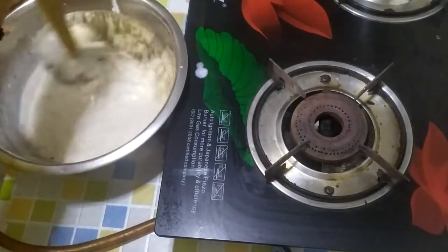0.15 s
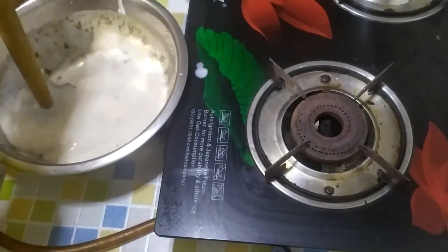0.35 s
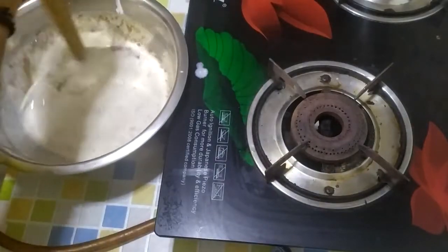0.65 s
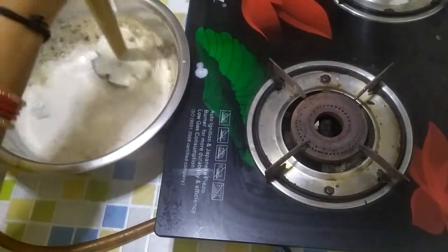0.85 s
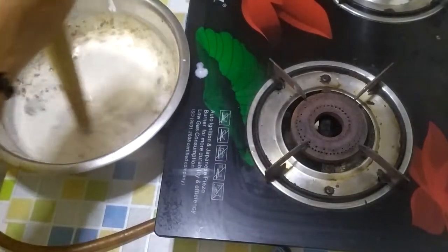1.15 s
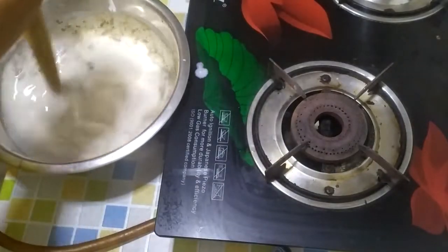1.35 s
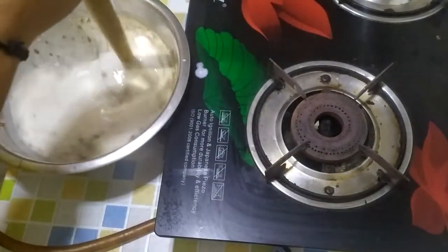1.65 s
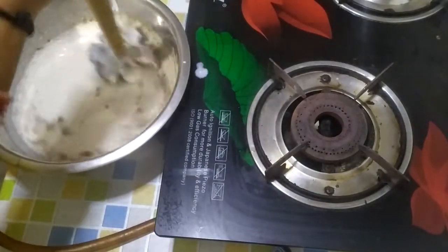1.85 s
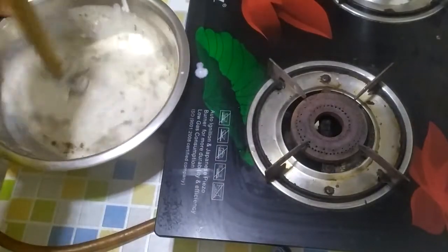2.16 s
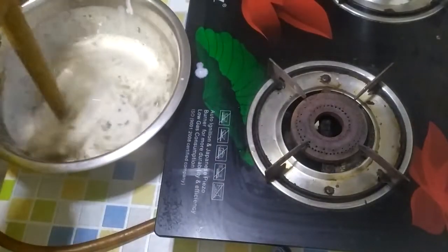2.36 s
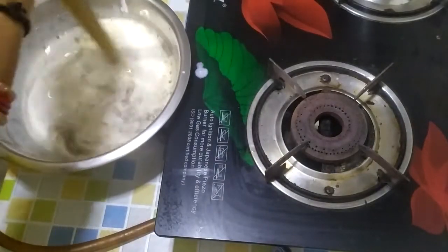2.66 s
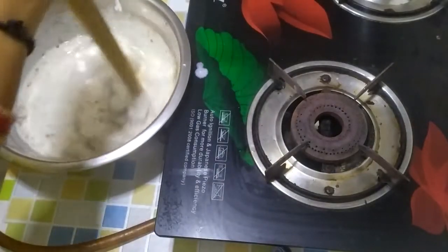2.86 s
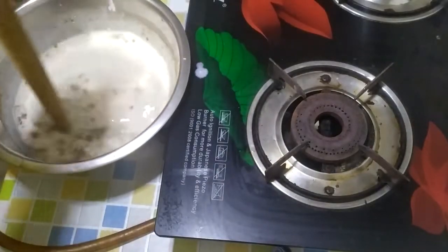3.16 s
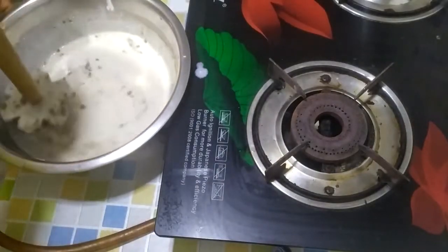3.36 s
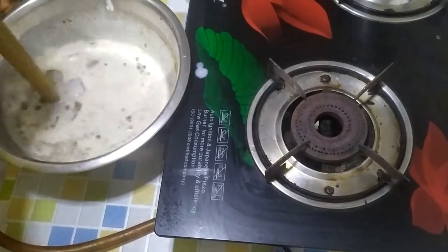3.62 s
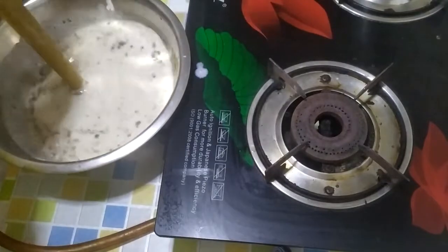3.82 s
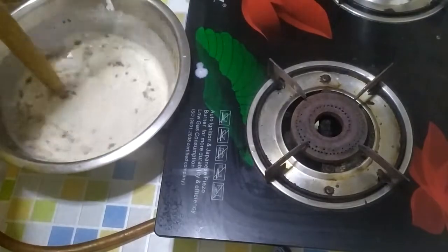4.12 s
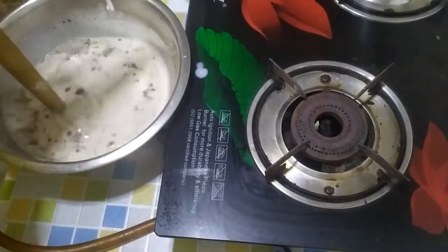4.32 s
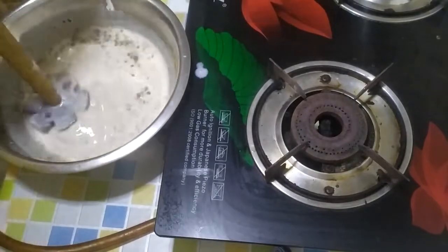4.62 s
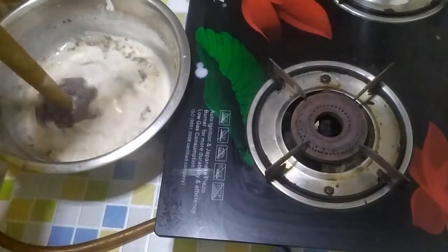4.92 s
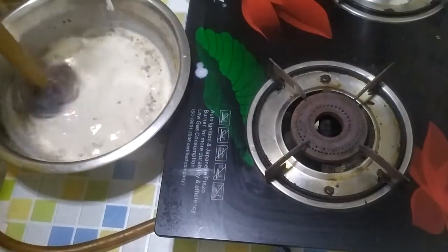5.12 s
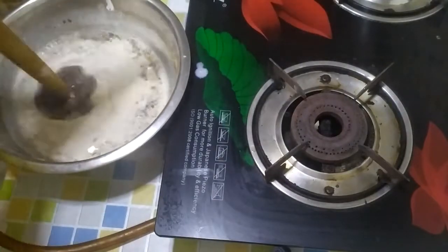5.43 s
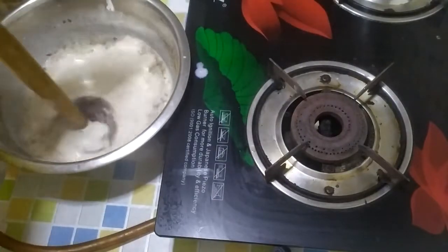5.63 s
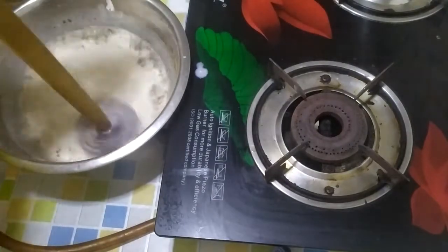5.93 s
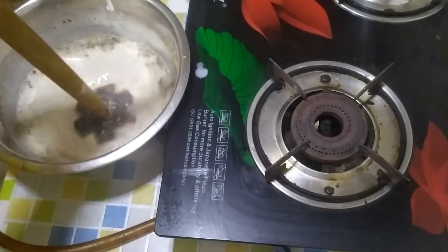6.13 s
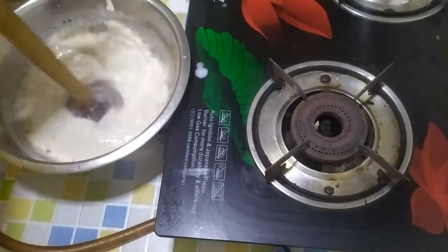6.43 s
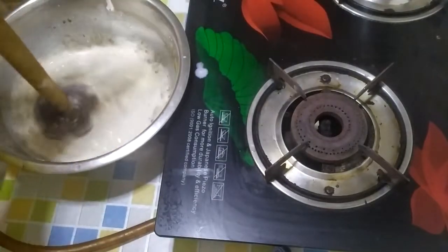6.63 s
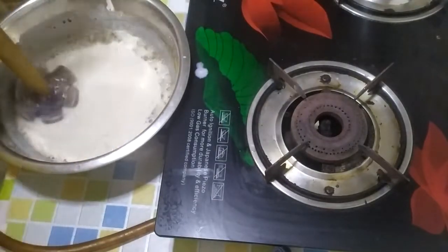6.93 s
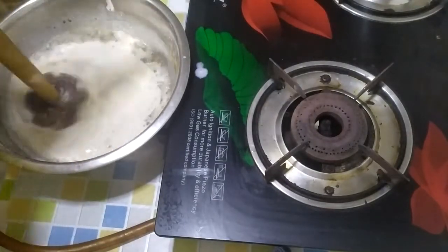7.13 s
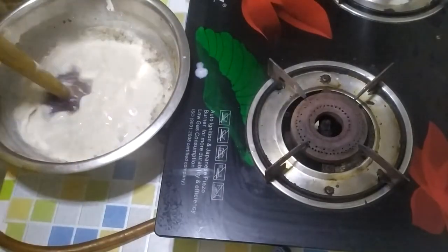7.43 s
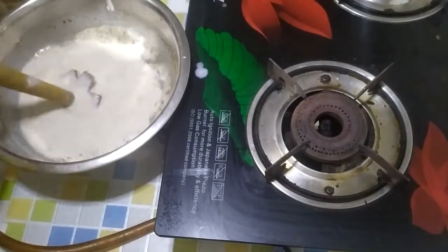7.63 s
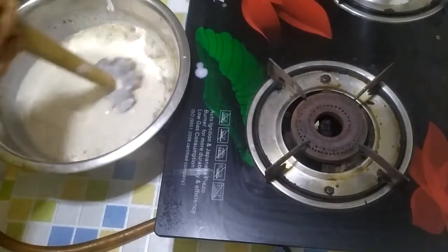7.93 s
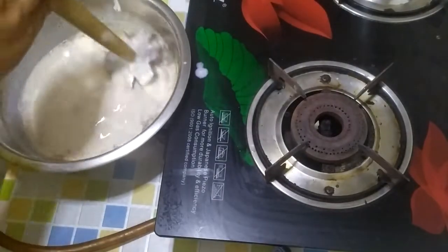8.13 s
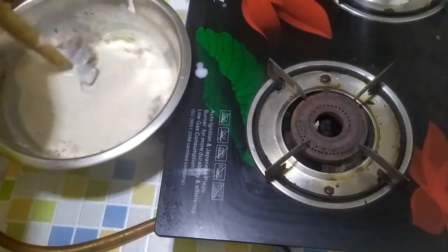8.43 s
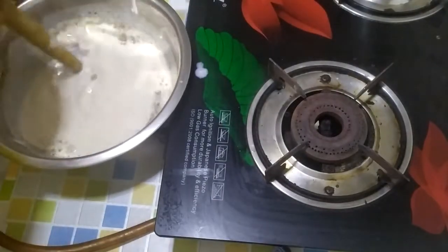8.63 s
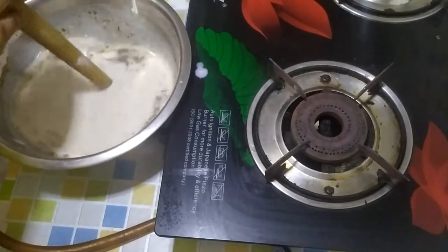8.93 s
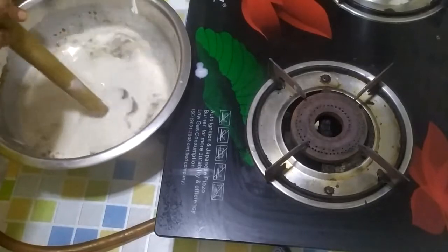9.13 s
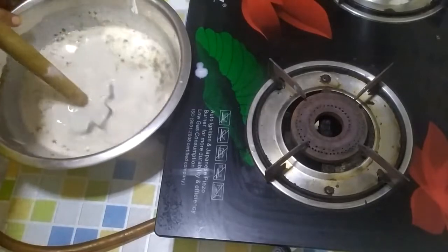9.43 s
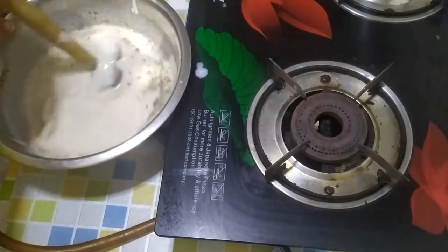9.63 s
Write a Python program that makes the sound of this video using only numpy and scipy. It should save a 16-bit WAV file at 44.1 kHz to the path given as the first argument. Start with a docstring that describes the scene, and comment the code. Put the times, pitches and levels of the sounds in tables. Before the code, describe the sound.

Soft wet smacks and little splashes come from thick yogurt being churned with a wooden stick, heard up close in a kitchen. The wood occasionally knocks the steel bowl, giving a short damped ring, and the bowl bumps dully on the worktop. The churning is liveliest in the second half and thins to a few wet clicks at the end, over a low room rumble.

```python
"""Churning yogurt in a steel bowl.

A wooden churner stirs and spins in thick yogurt in a hard-walled kitchen. Cavities splash,
air pockets pop, tiny smacks crackle. Knocks ring the bowl's modes; the worktop thumps and hums low.
Faint tones waver in the room noise. A phone's noise suppressor holds that noise down and shortens tails."""
import sys
import numpy as np
from scipy import signal
from scipy.fft import rfft, irfft, next_fast_len
from scipy.io import wavfile
from scipy.ndimage import uniform_filter1d

SR = 44100
rng = np.random.default_rng(int(sys.argv[2]) if len(sys.argv) > 2 else 0)


def inscribe(sig):
    """Save sig as 16-bit PCM at rate SR to the path in sys.argv[1].

    A 1-D sig is mono; a 2-D sig holds one channel per row.
    Samples are clipped to [-1, 1] before scaling.
    """
    pcm = np.round(np.clip(np.atleast_2d(sig).T, -1, 1) * 32767)
    wavfile.write(sys.argv[1], SR, pcm.astype(np.int16))


N = 430857

# Worktop and room hum. Each row: time in seconds, level in dB.
HUM_LEVELS = [(0.0, -57.5), (0.728, -57.5), (1.74, -63.5), (2.179, -54.5), (2.748, -73), (2.94, -56),
              (3.539, -68), (3.999, -52.5), (4.35, -57), (4.98, -54), (5.17, -46.5), (5.66, -62.5),
              (6.15, -47), (6.532, -57), (7.7, -47.5), (8.431, -59), (9.01, -58), (9.77, -61)]
# Each row: pitch in Hz, width in Hz, dB re hum level, fade after a stroke in dB/s.
WORKTOP_MODES = [(77.1, 13, -4, 85), (133.6, 24.3, 1.5, 132.5), (251, 190, -14, 155)]
# Each row: start in seconds, then lower mode, upper mode and slosh levels in dB.
HEAVY_STROKES = [(.06, -62.5, -90, -64.5), (.45, -50.5, -56.5, -64.5), (0.741, -51, -60, -53),
                 (1.041, -51, -53, -56.5), (1.94, -53, -61, -66), (2.206, -48.5, -48, -56.5),
                 (2.761, -54, -45, -52), (3.812, -30, -28.5, -56.5), (3.961, -47.5, -39, -74),
                 (4.138, -46.5, -41.5, -101), (4.52, -50.5, -73, -71.5), (5.066, -52, -44, -55.5),
                 (5.159, -39.5, -49, -42), (5.628, -47, -41, -36), (5.95, -38.5, -43, -30.5),
                 (6.17, -41, -45, -61), (6.73, -59, -61, -87.5), (6.883, -38, -44, -36.5),
                 (6.968, -39.5, -58.5, -43.5), (7.349, -40, -44, -41), (7.521, -25.5, -52.5, -43),
                 (7.719, -39, -69.5, -89.5), (7.907, -49.5, -52, -85), (8.092, -45.5, -50, -35),
                 (8.24, -55.5, -47.5, -59.5), (8.623, -64.5, -44, -57.5), (8.88, -55.5, -60, -69.5),
                 (9.097, -45, -45.5, -51), (9.3, -55.5, -78, -70.5)]
# Each row: frequency in Hz, relative noise density in dB.
ROOM_SPECTRUM = [(12, -58), (20, -1), (133, -6), (387, -21), (606, -20.5), (739, -21), (1340, -39.5),
                 (1680, -49.5), (2630, -53.5), (2980, -32.5), (3460, -44.5), (5160, -48.5), (7680, -47),
                 (9980, -96.5), (16900, -120)]
# Each row: pitch in Hz, width in Hz, level in dB, waver in dB.
STEADY_WHINES = [(1661, 110, -83, 3)]
# Each row: pitch in Hz, width in Hz, waver in dB.
TREBLE_WHINES = [(5150, 34, 1.5), (2990, 60, 2.5)]
# Each row: time in seconds, upper whine in dB, lower whine in dB.
TREBLE_WHINE_LEVELS = [(0, -99.5, -71), (.2, -82.5, -80.5), (.55, -77.5, -71), (.75, -98.5, -78),
                       (1.1, -89, -89), (1.25, -82, -80.5), (1.7, -80.5, -103.5), (1.9, -88.5, -88.5),
                       (2.15, -78, -74.5), (2.7, -79, -80.5), (2.96, -78, -86), (3.1, -85, -89.5),
                       (3.35, -97, -93.5), (3.6, -83, -85), (3.9, -82, -80), (4.25, -80.5, -76.5),
                       (4.42, -81, -77), (4.8, -87, -82.5), (5.6, -88, -77.5), (6.5, -83.5, -72),
                       (6.85, -84.5, -82), (7.601, -86.5, -84), (7.9, -99, -85), (8.45, -92, -96),
                       (8.57, -93.5, -75.5), (8.75, -88.5, -85.5), (8.9, -83.5, -86), (9.05, -81, -82),
                       (9.15, -91, -85), (9.359, -75.5, -93.5), (9.55, -91.5, -86.5), (9.77, -92, -86.5)]
# Fuzzy hollow tone. Each row: time in seconds, level in dB.
HOLLOW_LEVELS = [(0, -73), (.3, -71), (.55, -75.5), (.8, -71.5), (1.4, -77.5), (1.55, -63.5), (1.75, -75.5),
                 (2.17, -64), (2.35, -75.5), (3.15, -76), (3.25, -68), (3.6, -79), (3.85, -66), (4.15, -69),
                 (4.4, -75.5), (5.05, -67.5), (6.6, -68), (7.95, -66), (8.4, -65.5), (8.52, -75.5),
                 (8.65, -65), (8.8, -76), (9.13, -68), (9.28, -78.5), (9.4, -70), (9.77, -78.5)]
# Each row: time in seconds, level in dB.
CRACKLE_LEVELS = [(0.0, -67.5), (0.272, -71), (0.52, -69.5), (.8, -70), (1.1, -66.5), (1.33, -71),
                  (1.66, -70), (1.85, -70), (2.3, -74.5), (2.86, -69.5), (3.211, -71), (4.19, -74.5),
                  (5.3, -72), (5.85, -62), (6.28, -69.5), (6.77, -72), (6.94, -73.5), (7.05, -58.5),
                  (7.529, -69.5), (7.731, -86.5), (8.49, -75), (9.77, -76)]
# Splashes and wet clicks. Each row: start in seconds, cavity ring in dB, puff in dB,
# puff centre in octaves above 2.8 kHz, cavity pitch in Hz, decay in seconds (capped by burst).
SPLASH_EVENTS = [(0.0014, -52.5, -50.5, 0.8, 1675, 0.0081), (0.0606, -45, -47, 0.03, 2800, 0.007),
                 (.1, -53, -58, -0.43, 2820, .008), (0.149, -65.5, -69, 1, 4214, 0.03),
                 (0.327, -65, -56, -0.9, 5200, 0.0059), (0.3394, -59, -41, 0.93, 4770, 0.027),
                 (0.561, -62.5, -57, -1.1, 4870, 0.033), (0.5774, -60, -49.5, 0.65, 5600, 0.037),
                 (0.624, -51.5, -75, 2.7, 1530, 0.013), (0.679, -66, -78, 1.5, 6480, 0.0078),
                 (0.692, -52.5, -53.5, -0.6, 2210, 0.016), (0.707, -62.5, -78, 1.2, 4000, 0.019),
                 (0.796, -39.5, -51, 0.26, 1880, 0.0029), (0.869, -63, -73, 2.2, 4710, 0.021),
                 (0.916, -55.5, -64.5, -0.8, 2160, 0.0068), (0.992, -54, -48.5, -1.77, 1200, 0.0034),
                 (1.018, -44.5, -58, 0.2, 1290, 0.01), (1.047, -42.5, -51, 0.35, 4350, 0.0037),
                 (1.058, -55, -69, 0, 2985, .01), (1.092, -50.5, -58.5, 0.54, 3750, 0.0056),
                 (1.099, -60.5, -70.5, -1.2, 2286, 0.022), (1.273, -55, -69.5, 1.2, 2945, 0.011),
                 (1.291, -73, -64, -0.3, 4750, 0.011), (1.31, -54, -51.5, 0.25, 2250, 0.0062),
                 (1.372, -61.5, -61, 1, 4760, 0.012), (1.374, -56, -58, 0, 2910, 0.0082),
                 (1.434, -58.5, -78, 3.9, 4490, 0.0036), (1.435, -49, -64.5, 1.4, 1890, 0.005),
                 (1.511, -65, -64.5, 0.4, 2580, 0.019), (1.61, -64, -74, -2, 2750, .01),
                 (1.697, -56, -80.5, -3, 1130, .02), (1.666, -63, -69.5, 1.2, 4374, 0.011),
                 (1.904, -38.5, -94.5, -3.5, 10670, 0.0068), (1.905, -33.5, -30, 0.6, 6300, 0.0021),
                 (2.06, -57.5, -53.5, 0.63, 2357, 0.018), (2.312, -64, -47, 0.9, 4580, 0.032),
                 (2.4374, -68, -58, -0.8, 1710, 0.044), (2.645, -42.5, -54.5, -0.1, 2403, 0.0046),
                 (2.68, -66, -63, 0.5, 4300, 0.0059), (2.741, -40.5, -48.5, 0.4, 1650, 0.022),
                 (2.9763, -46.5, -42, -0.41, 3140, 0.008), (3.214, -61, -66, 0.7, 4650, 0.0091),
                 (3.546, -45.5, -44.5, 0.14, 4590, 0.0079), (3.583, -51.5, -67, 1.8, 4670, 0.0031),
                 (3.201, -62, -63.5, -1.5, 1000, .01), (3.21, -65, -75, 1.6, 3300, .006),
                 (3.797, -52, -55, -1, 1100, 0.013), (4.296, -55, -60, 0.5, 1560, 0.0049),
                 (4.32, -52, -62.5, 0.7, 1737, 0.0059), (4.321, -54, -74, -2, 2430, .005),
                 (4.322, -58.5, -80, -2, 1210, .006), (4.439, -55.5, -53.5, -1.1, 1500, 0.015),
                 (4.44, -50.5, -62.5, -0.5, 3040, .012), (4.449, -61.5, -64, 1.3, 4430, .012),
                 (4.52, -51, -51.5, 0.18, 2960, 0.018), (4.54, -64, -52, 0.9, 4250, 0.0083),
                 (4.544, -42.5, -48, -0.08, 1595, 0.024), (4.597, -48, -41, 0.38, 4220, 0.0038),
                 (4.794, -52.5, -59, -0.9, 2490, 0.05), (4.83, -55, -55, 0.5, 2340, 0.0057),
                 (4.847, -56.5, -52, 0.54, 2550, 0.05), (4.855, -43.5, -45, -0.65, 2850, 0.023),
                 (4.955, -50.5, -48, -0.86, 5010, 0.0035), (4.995, -51.5, -57, 0.7, 2594, 0.0086),
                 (5.069, -36, -47.5, 0.07, 1860, 0.0056), (5.112, -48, -60.5, -0.7, 1750, 0.0055),
                 (5.173, -27, -31.5, -0.15, 2700, 0.0029), (5.393, -48.5, -74.5, 7, 4740, 0.0055),
                 (5.409, -40, -62.5, 1, 2990, 0.0074), (5.427, -35, -48.5, -0.6, 2625, 0.0063),
                 (5.433, -51, -46, 0.49, 5300, 0.0034), (5.44, -43, -45, -0.13, 2930, 0.014),
                 (5.479, -42.5, -37, 0.15, 3100, 0.0059), (5.487, -42.5, -65.5, -0.29, 3650, .01),
                 (5.522, -51, -59, 0.9, 5300, 0.005), (5.606, -53, -51, -1.2, 4630, 0.0026),
                 (5.618, -45, -40, 0.64, 2360, 0.0085), (5.6286, -32, -34.5, -0.37, 2580, 0.013),
                 (5.806, -52, -79.5, 2.3, 4660, 0.0025), (5.944, -38, -92.5, 2.5, 11200, 0.011),
                 (5.946, -39, -30.5, 0.36, 1595, 0.015), (6.061, -38, -39, 0.46, 2420, 0.01),
                 (6.081, -56.5, -51, 0.14, 4970, 0.033), (6.11, -36, -43, 0.45, 2260, 0.0082),
                 (6.258, -42.5, -56, -0.14, 2060, 0.019), (6.338, -46, -57, 0.3, 2142, 0.03),
                 (6.361, -64.5, -72, 1.8, 4440, 0.013), (6.389, -43, -60, 0.9, 4690, 0.0035),
                 (6.393, -33, -46, -0.4, 2726, 0.0064), (6.416, -45.5, -71, -1, 3090, 0.0052),
                 (6.441, -36.5, -42.5, 0.12, 2500, 0.0029), (6.601, -35, -41, -0.04, 2566, 0.0037),
                 (6.65, -37.5, -44.5, -0.03, 3044, 0.0038), (6.8897, -34.5, -32.5, -0.12, 1720, 0.0036),
                 (7.111, -54, -55, -1.9, 4980, 0.0034), (7.116, -49, -67.5, -1.8, 4600, 0.0035),
                 (7.118, -37, -78, -1.5, 1210, 0.01), (7.1194, -33.5, -32.5, -0.07, 2790, 0.0023),
                 (7.206, -44, -67.5, -1.2, 4610, 0.0019), (7.175, -61.5, -78, 0, 6750, 0.0031),
                 (7.288, -52.5, -67, -1.6, 2580, 0.0088), (7.299, -62, -79, 9, 6540, 0.0045),
                 (7.335, -32.5, -37, 0.4, 2530, 0.0077), (7.373, -44.5, -38, 0.7, 1824, 0.01),
                 (7.478, -40.5, -44.5, -0.7, 1332, 0.031), (7.515, -49.5, -64, 1.3, 4970, 0.0031),
                 (7.5625, -47.5, -57.5, 0.1, 2306, 0.049), (8.122, -42, -44.5, 0.03, 1194, 0.036),
                 (8.205, -50.5, -53, 0.44, 2766, 0.033), (8.814, -54.5, -70.5, 0.9, 4370, 0.003),
                 (8.922, -44, -55, -.5, 2266, 0.01), (8.967, -60, -63, -1.14, 2340, 0.017),
                 (9.027, -60.5, -65, 0.5, 3065, 0.023), (9.362, -57.5, -63.5, 0.5, 3500, 0.0092),
                 (9.546, -65.5, -56.5, -0.6, 2090, 0.11), (9.592, -62.5, -62, 0.2, 2136, 0.016)]
# Colour of all puffs. Each row: frequency in Hz, gain in dB.
PUFF_SPECTRUM = [(800, 10.5), (1300, 0.5), (2400, -1), (3300, -9), (5300, -8.5), (6800, -12), (11000, -1)]
# Each row: start in seconds, level in dB, pitch in Hz, length in seconds.
BRIEF_TONES = [(0.095, -66.5, 1046, 0.12), (0.057, -64, 453, 0.11), (2.068, -82.5, 1940, .3),
               (9.492, -77.5, 2987, .2), (0.701, -64.5, 1104, 0.12), (0.68, -85.5, 5566, 0.38),
               (0.421, -71, 3200, 0.1), (3.408, -77.5, 1680, 0.12), (4.211, -74.5, 1312, 0.049),
               (9.703, -69.5, 956, .05), (0.447, -77.5, 2110, 0.16), (1.037, -79, 2340, 0.25),
               (1.31, -67.5, 1140, 0.048), (6.568, -66.5, 1145, 0.12), (6.824, -78.5, 3860, 0.042),
               (0.182, -86.5, 5620, 0.2), (1.689, -85, 5720, 0.24), (2.074, -77, 1620, 0.15),
               (2.152, -82.5, 3760, 0.19), (2.293, -75.5, 3410, 0.56), (3.795, -63, 1023, 0.08),
               (4.42, -71.5, 4320, 0.23), (5.173, -59, 5460, 0.058), (6.351, -69.5, 1066, 0.088),
               (6.496, -64, 496, 0.3), (6.555, -72, 1646, 0.13), (6.951, -49.5, 489, 0.23),
               (7.136, -56, 896, 0.093), (7.453, -71.5, 2120, 0.44), (7.72, -55, 332, 0.26),
               (7.92, -71.5, 1320, 0.13), (8.201, -80, 2640, 0.21), (8.202, -75, 4220, 0.19)]
# Each row: start in seconds, level in dB, starting pitch in Hz, T60 in seconds.
AIR_POCKETS = [(0.065, -36.5, 726, 0.037), (0.611, -38, 715, 0.065), (0.699, -49, 680, 0.048),
               (1.025, -46, 1296, 0.03), (1.062, -34, 1020, 0.019), (1.267, -46.5, 1436, 0.019),
               (2.745, -49, 728, 0.092), (3.2, -54.5, 730, .12), (1.906, -20.5, 785, 0.023),
               (2.464, -63, 1495, 0.044), (4.54, -49, 1640, 0.042), (4.577, -41, 1322, 0.035),
               (4.593, -35, 1245, 0.012), (5.071, -39.5, 1823, 0.051), (5.384, -58.5, 1244, 0.13),
               (5.427, -42, 1210, 0.026), (6.512, -47.5, 529, 0.21), (6.628, -41.5, 560, 0.03),
               (6.742, -43.5, 521, 0.051), (7.167, -45, 467, 0.15), (7.422, -34, 1370, 0.03),
               (7.501, -37.5, 534, 0.061), (7.95, -67, 1285, 0.09)]
# Churner on bowl. Each row: start in seconds, level in dB, treble, bass and hollow-band trims in dB,
# ring gain in dB, contact decay in seconds (capped by burst).
BOWL_KNOCKS = [(1.902, -22, -13.5, -52, -1, 0, 0.0018), (2.739, -36.5, -13.5, -2.5, -9.5, -1.5, 0.0044),
               (3.795, -42, -18.5, 8.5, -2.5, 8.5, 0.0057), (4.064, -51, -37, 11, 11, 11, 0.011),
               (4.163, -58.5, -25, -5.5, -1, 5, 0.007), (5.154, -37, -6, 3, -1, 22, 0.005),
               (5.165, -39.5, -6, -2, 4.5, 9, 0.021), (5.62, -29.5, -19.5, -16.5, -3.5, 7.5, 0.0069),
               (5.941, -20.5, -6.5, -2.5, -3, 10.5, 0.0075), (6.872, -35.5, -5, 2, 6.5, 12, 0.019),
               (6.897, -31.5, 1.5, -15, 6, 8.5, 0.0047), (7.328, -47, -4.5, 2, 2, 12, 0.067),
               (7.406, -45, -9.5, 6.5, 9, 5.5, 0.036), (7.523, -49.5, -22.5, 1.5, 16, 8, 0.022),
               (8.088, -32, -5, 2, -4.5, -1, 0.013)]
# Each row: pitch in Hz, width in Hz, weight in dB (halved on use).
BOWL_MODES = [(234.3, 14, 8.5), (368, 22, -8.5), (443, 9.5, -12.5), (482, 69, -3), (607, 15, -5),
              (655, 22, 6), (863, 25, -13), (970, 36, -22.5), (1126, 190, -11), (1210, 230, -16),
              (1590, 33, -7.5), (1880, 21, -22), (2340, 47, -11.5), (2820, 300, -11), (3200, 20, -31.5),
              (4220, 38, -29), (5300, 19, -0.5), (6700, 500, -2.5)]
# Broad noise of a knock. Each row: frequency in Hz, gain in dB.
CRACK_SPECTRUM = [(88, -30), (150, -16), (198, -4), (238, 1), (533, -7), (650, 1.5), (717, -6.5),
                  (2860, -23.5), (4250, -31), (5430, -22.5), (7680, -38), (8800, -46.5), (10200, -43),
                  (11800, -30.5), (16900, -120)]
# Each row: centre time in seconds, level in dB, pitch in Hz.
WORKTOP_BUMPS = [(2.2215, -29, 134.4), (2.7525, -35.5, 198), (3.835, -29.5, 120.5), (4.063, -32.5, 251.7),
                 (4.1884, -29.5, 200), (5.8831, -31, 220), (6.2097, -25, 104), (6.2636, -33.5, 117.6),
                 (6.992, -24.5, 95), (7.1361, -25, 98), (7.5463, -37, 79.3), (8.658, -32, 181),
                 (8.7137, -36, 161.6), (9.114, -26.5, 146.3), (9.153, -49.5, 144.7)]
# Each row: frequency in Hz, T60 in seconds.
KITCHEN_DECAY = [(150, 0.73), (400, 0.45), (1000, 0.51), (3000, 0.46), (7000, 0.27)]
# Each row: frequency in Hz, gain in dB.
MIC_RESPONSE = [(20, -5.5), (60, -6), (6500, 2.5), (7300, -3), (7900, -4.5), (8400, -9), (12000, -38.5)]


def amp(db):
    return 10 ** (np.asarray(db) / 20)


def unit_rms(x):
    return x / np.sqrt(np.mean(x ** 2) + 1e-20)


def at_hz(points, hz):
    knots_hz, values = np.transpose(points)
    return np.interp(np.log(hz + 1), np.log(knots_hz + 1), values)


def over_time(points, column=1):
    columns = np.transpose(points)
    return np.interp(np.arange(N) / SR, columns[0], columns[column])


def add(mix, start_s, sound):
    part = mix[round(start_s * SR):][:len(sound)]
    part += sound[:len(part)]


def drift(size, span):
    """Unit-RMS noise, smoothed twice over span samples."""
    return unit_rms(uniform_filter1d(uniform_filter1d(rng.standard_normal(size), span), span))


def resonate(x, hz, width_hz):
    """One resonance, unity gain at centre."""
    r = np.exp(-np.pi * width_hz / SR)
    gain = (1 - r * r) / 2
    return signal.lfilter([gain, 0, -gain], [1, -2 * r * np.cos(2 * np.pi * hz / SR), r * r], x)


def burst(colour_db, decay_s, rise_s, size=4096):
    """Minimum-phase coloured noise burst with the energy of its envelope."""
    t = np.arange(size) / SR
    envelope = (1 - np.exp(-t / rise_s)) * np.exp(-t / np.clip(decay_s, .0002, .04))
    db = colour_db(np.fft.rfftfreq(size, 1 / SR))
    log_gain = np.log(amp(np.maximum(db, db.max() - 70)))
    cepstrum = irfft(log_gain) * np.r_[1, 2 * np.ones(size // 2 - 1), 1, np.zeros(size // 2 - 1)]
    coloured = irfft(rfft(envelope * rng.standard_normal(size)) * np.exp(rfft(cepstrum)))
    return unit_rms(coloured) * np.sqrt(np.mean(envelope ** 2))


def worktop_hum(rise_s=.011):
    """Lumpy rubbing noise drives the low modes; each heavy stroke swells them."""
    out, t = np.zeros(N), np.arange(SR // 2) / SR
    rise = 1 - np.exp(-(t / rise_s) ** 2)
    for k, (hz, width_hz, db, fade_db_per_s) in enumerate(WORKTOP_MODES):
        level = amp(db + over_time(HUM_LEVELS))
        for start_s, *stroke_db in HEAVY_STROKES:
            add(level, start_s, amp(stroke_db[k] - fade_db_per_s * t) * rise)
        lumps = amp(2.6 * unit_rms(uniform_filter1d(rng.standard_normal(N), 900)))
        ring = resonate(resonate(lumps * rng.standard_normal(N), hz, width_hz), hz, 3 * width_hz)
        ring /= uniform_filter1d(abs(ring), 3000) ** .15  # tames chance swells
        out += unit_rms(ring) * level
    return out


def room_noise(level_db=-56):
    """Steady noise, mostly rumble."""
    size = next_fast_len(N)
    colour = amp(at_hz(ROOM_SPECTRUM, np.fft.rfftfreq(size, 1 / SR)))
    return amp(level_db) * unit_rms(irfft(rfft(rng.standard_normal(size)) * colour, size))[:N]


def whines(hollow_hz=735, hollow_width_hz=30, hollow_waver_db=2.5):
    """Narrow noise bands: three faint whines and a hollow tone, each wavering in level."""
    treble = [(hz, width_hz, over_time(TREBLE_WHINE_LEVELS, column), waver_db)
              for column, (hz, width_hz, waver_db) in enumerate(TREBLE_WHINES, 1)]
    hollow = (hollow_hz, hollow_width_hz, over_time(HOLLOW_LEVELS), hollow_waver_db)
    out = np.zeros(N)
    for hz, width_hz, db, waver_db in STEADY_WHINES + treble + [hollow]:
        level = amp(db + waver_db * drift(N, 1500))
        band = resonate(resonate(rng.standard_normal(N), hz, width_hz), hz, 3 * width_hz)
        out += level * unit_rms(band)
    return out


def crackle(smacks_per_s=450, decay_cycles=16, spread_db=2.8):
    """Stirring makes tiny sticky smacks, each ringing at one of 30 rising pitches."""
    out, t = np.zeros(N), np.arange(2400) / SR
    fires = rng.random(N) < smacks_per_s / SR
    pitch_index = rng.integers(0, 30, N)
    smacks = fires * amp(spread_db * np.minimum(rng.exponential(1, N), 3))
    for k, hz in enumerate(np.geomspace(260, 5000, 30)):
        envelope = np.exp(-t * hz / decay_cycles) * (1 - np.exp(-t / .0045))
        grain = envelope * np.sin(2 * np.pi * hz * t * (1 + 2.5 * t))
        out += signal.oaconvolve(smacks * (pitch_index == k), grain)[:N]
    return unit_rms(out) * amp(over_time(CRACKLE_LEVELS))


def splashes(tick_s=.0012, snap_s=.0004, ripple_periods_hz=(813.73, 1221.97), cavity_spread=.097):
    """A tick, the snap of tearing yogurt film, then a puff and the ring of the opened cavity."""
    out = np.zeros(N)
    for start_s, cavity_db, puff_db, centre_oct, cavity_hz, decay_s in SPLASH_EVENTS:
        phases = rng.random(2)

        def colour_db(hz):
            # Several small cavities ripple the puff's spectrum.
            ripple_db = 3 * sum(np.cos(2 * np.pi * (hz / period_hz + phase))
                                for period_hz, phase in zip(ripple_periods_hz, phases))
            falloff_db = 19.5 * (np.log2((hz + 1) / 2800) - centre_oct) ** 2
            ring_db = cavity_db + 2 - 6 * ((hz / cavity_hz - 1) / cavity_spread) ** 2
            return np.maximum(puff_db + ripple_db + at_hz(PUFF_SPECTRUM, hz) - falloff_db, ring_db)

        power = np.mean(amp(colour_db(np.linspace(500, 13000, 330))) ** 2)
        tick = amp(1.5) * burst(colour_db, tick_s, tick_s / 2)
        snap = amp(-4) * burst(colour_db, snap_s, snap_s / 2)
        body = burst(colour_db, decay_s, .18 * decay_s)
        add(out, start_s, amp(8) * np.sqrt(power) * (tick + snap + body))
    return out


def brief_tones():
    """Faint narrow noise bands swell and fade, most after a splash or knock."""
    out = np.zeros(N)
    for start_s, db, hz, length_s in BRIEF_TONES:
        band = resonate(resonate(rng.standard_normal(SR), hz, 25 + .008 * hz), hz, 150)
        tone = unit_rms(band)[-round(length_s * SR):]
        add(out, start_s, amp(db) * tone * signal.windows.tukey(len(tone), .4))
    return out


def pops(roughness=.3, wobble=.015, hold_exponent=1.32, glide_per_s=2):
    """A bursting air pocket rings as a rough, wobbling, rising tone that holds briefly and dies."""
    out, t = np.zeros(N), np.arange(8000) / SR
    for start_s, db, hz, t60_s in AIR_POCKETS:
        flutter = 1 + roughness * drift(len(t), 120)
        pitch_hz = hz * (1 + glide_per_s * t + wobble * drift(len(t), 120))
        envelope = amp(db - 60 * (t / t60_s) ** hold_exponent) * (1 - np.exp(-t / .0011))
        add(out, start_s, envelope * flutter * np.sin(2 * np.pi * np.cumsum(pitch_hz) / SR))
    return out


def knocks(scatter_db=.5, detune=.0074):
    """Wood touches steel, then a scraping blow cracks and drives the bowl's damped modes."""
    out = np.zeros(N)
    for start_s, db, treble_db, bass_db, hollow_db, ring_db, contact_s in BOWL_KNOCKS:
        tilt = [(250, bass_db), (420, hollow_db), (560, hollow_db), (650, .0055), (1100, 0),
                (2000, treble_db + 9.5)]
        colour_db = lambda hz: at_hz(tilt, hz) + at_hz(CRACK_SPECTRUM, hz)
        touch = amp(-8) * burst(colour_db, decay_s=.002, rise_s=.0012)
        scrape = burst(colour_db, contact_s, rise_s=.014)
        blow = np.pad(amp(db) * (touch + scrape), (0, SR // 4))
        ring = 0
        for hz, width_hz, weight_db in BOWL_MODES:
            # Each blow lands elsewhere and the yogurt lies differently.
            gain = amp(weight_db / 2 + rng.normal(0, scatter_db))
            ring += gain * resonate(blow, hz * rng.normal(1, detune), width_hz)
        add(out, start_s, amp(1.5) * blow + amp(ring_db) * ring)
    return out


def bumps(front_steepness=1.1, lead_rad=.4, tap_db=-24.5):
    """A push of about one cycle through the worktop gives the bowl a dull tap."""
    out, t = np.zeros(N), np.arange(2000) / SR
    for centre_s, db, hz in WORKTOP_BUMPS:
        cycles = (t * hz - 1) * np.where(t * hz < 1, front_steepness, 1)
        push = np.exp(-(2.6 * cycles) ** 2) * np.cos(2 * np.pi * cycles - lead_rad)
        tap = burst(lambda f: -9 * np.log2((f + 1) / 650) ** 2, decay_s=.0045, rise_s=.0014)
        add(out, centre_s - 1 / hz, amp(db) * push)
        add(out, centre_s - .003, amp(db + tap_db) * tap)
    return out


def kitchen_echo(x):
    """Sparse wall reflections of random sign; each band decays at its own rate."""
    taps = np.zeros(SR)
    slots = np.arange(150, SR - 20, 20)
    taps[slots + rng.integers(0, 20, len(slots))] = rng.choice([-1., 1.], len(slots))
    hz, t, bins = signal.stft(taps, SR, nperseg=256)
    decay = amp(-60 * t / at_hz(KITCHEN_DECAY, hz)[:, None])
    tail = signal.istft(bins * decay, SR, nperseg=256)[1]
    return signal.fftconvolve(x, tail / np.linalg.norm(tail))[:N]


def scene():
    """Mono mix: bowl, yogurt and thumps with echo, over hum and room sound."""
    bowl, yogurt, thumps = knocks(), splashes() + pops() + crackle(), bumps()
    echo = sum(amp(db) * kitchen_echo(x) for x, db in [(bowl, 3.5), (yogurt, -4.5), (thumps, -11)])
    background = worktop_hum() + room_noise() + whines() + brief_tones()
    return (bowl + yogurt + thumps + echo + background)[None]


def record(dry, hold=.85, floor_db=-11, bypass_below_hz=300, hiss_db=-91, cutoff_hz=12700):
    """Microphone colour, suppression of bins near their quiet level, faint hiss, low-pass."""
    hz, _, bins = signal.stft(dry[0], SR, nperseg=512, noverlap=384)
    bins *= amp(at_hz(MIC_RESPONSE, hz))[:, None]
    power = uniform_filter1d(abs(bins) ** 2, 3, axis=0)
    power = signal.lfilter([1 - hold], [1, -hold], power)  # gate opens fast, closes slowly
    quiet_power = np.percentile(power, 20, axis=1)[:, None]
    gain = np.maximum(1 - 2.4 * quiet_power / (power + 1e-20), amp(floor_db))
    gain[hz < bypass_below_hz] = 1
    bins *= uniform_filter1d(gain, 4, axis=1)
    suppressed = signal.istft(bins, SR, nperseg=512, noverlap=384)[1][:N]
    hiss = amp(hiss_db) * rng.standard_normal(N)
    lowpass = signal.firwin(511, cutoff_hz, window=("kaiser", 9), fs=SR)
    return signal.oaconvolve(suppressed + hiss, lowpass, "same")[None]


dry = scene()
out = record(dry)
inscribe(out)
```